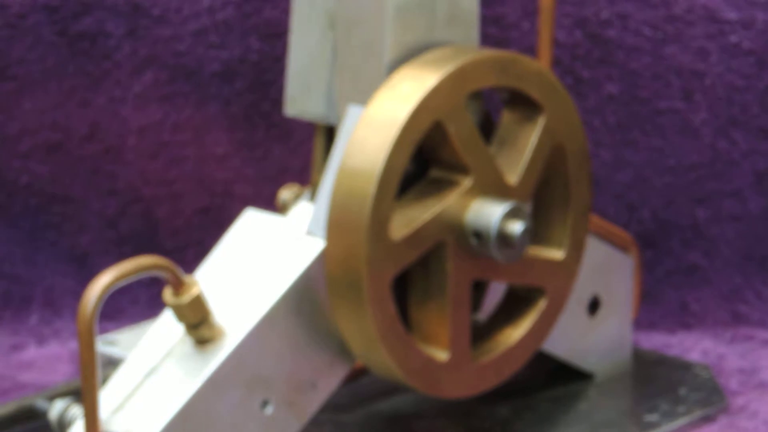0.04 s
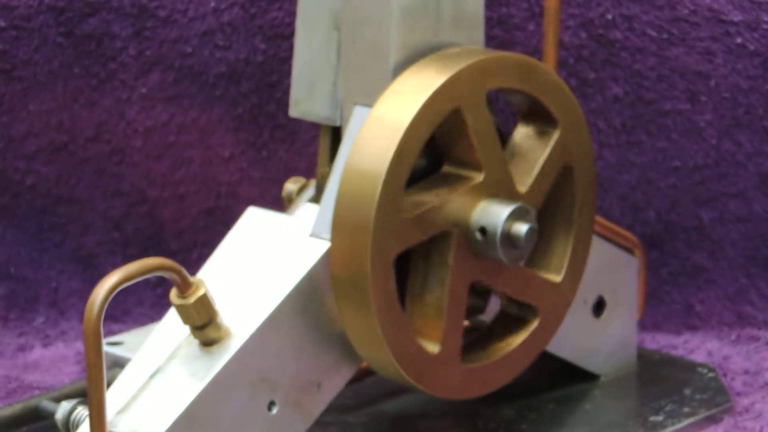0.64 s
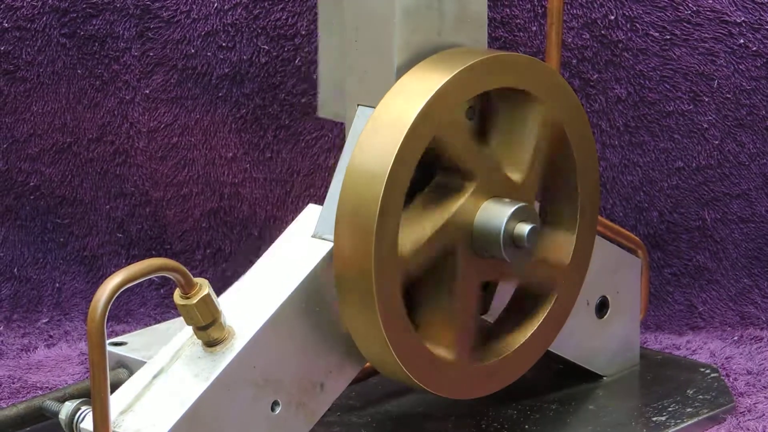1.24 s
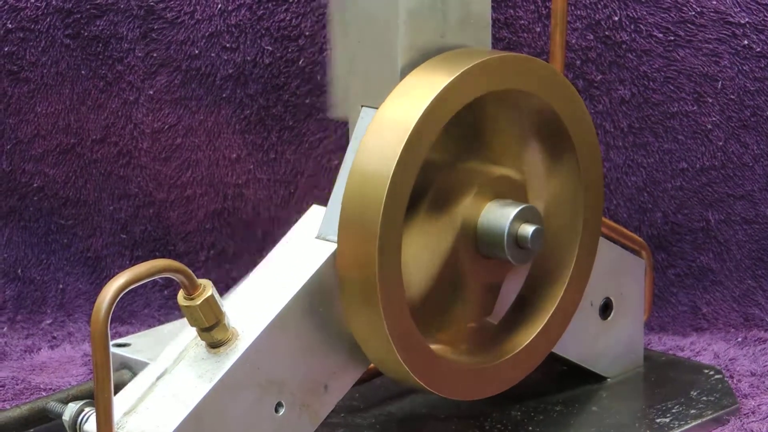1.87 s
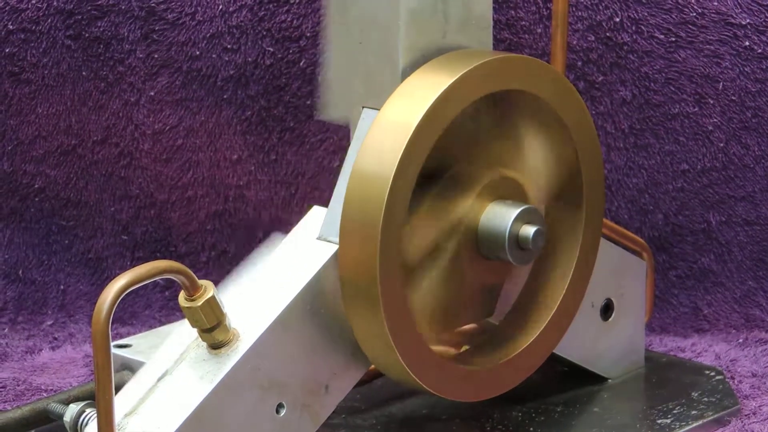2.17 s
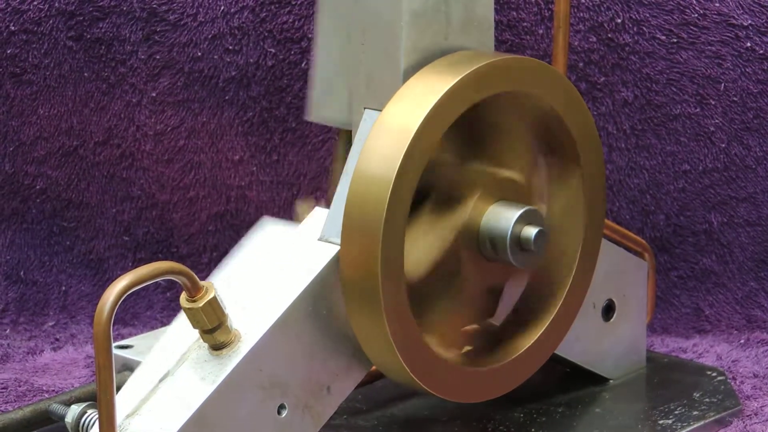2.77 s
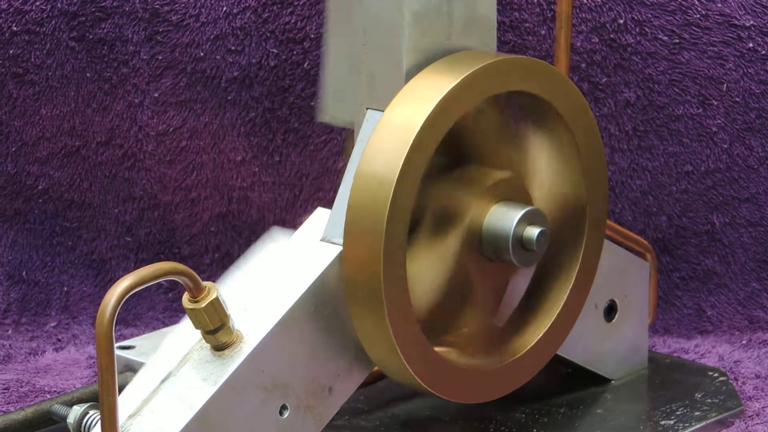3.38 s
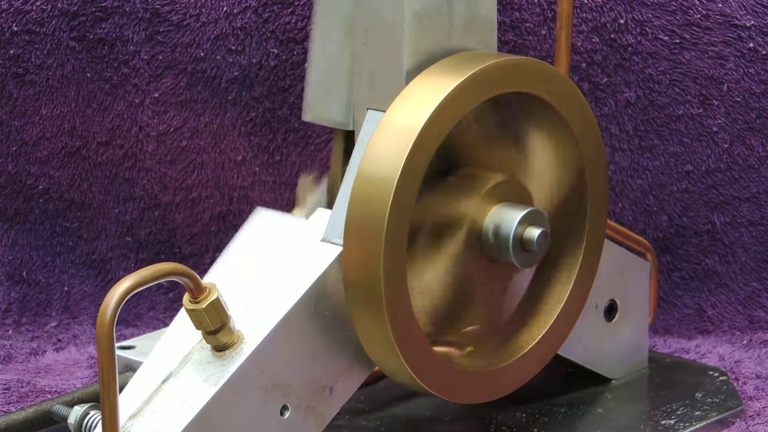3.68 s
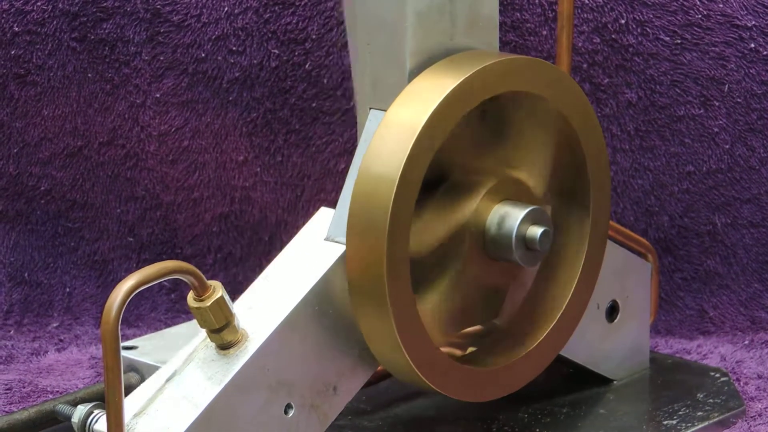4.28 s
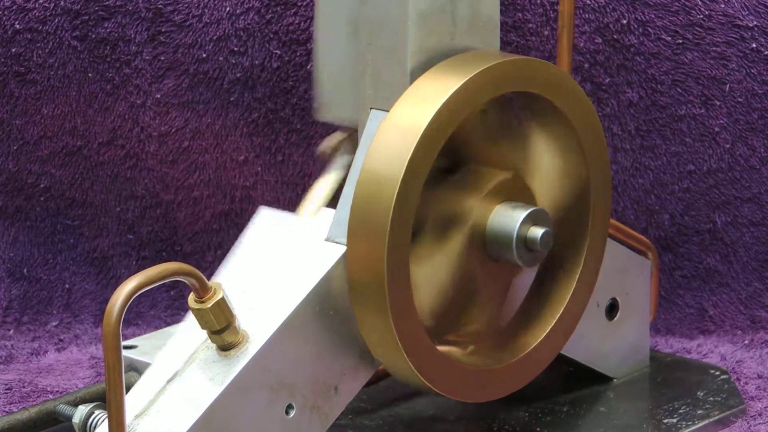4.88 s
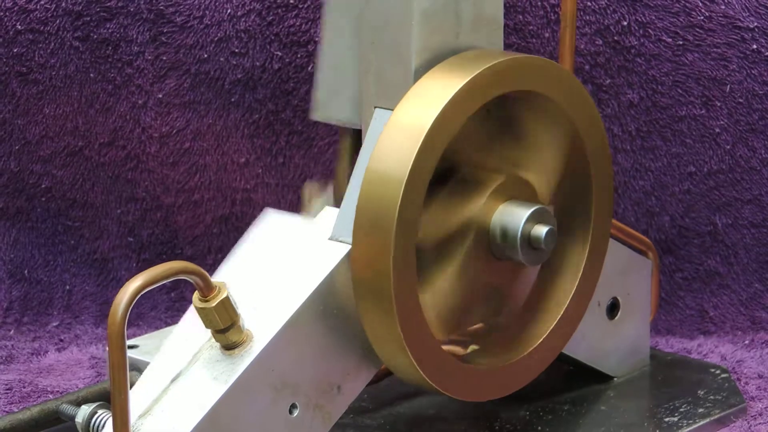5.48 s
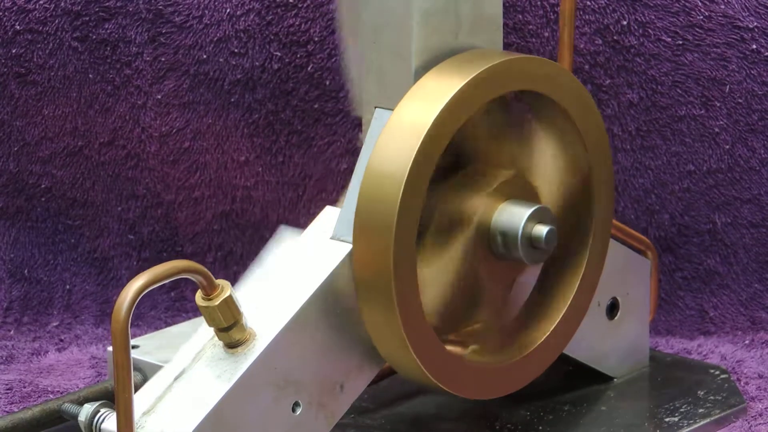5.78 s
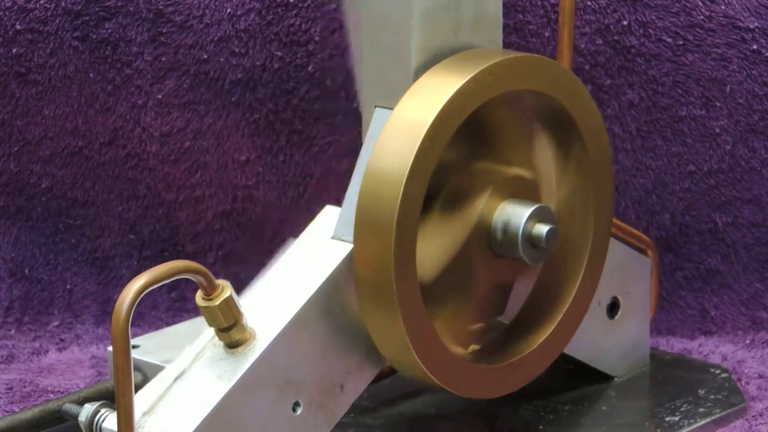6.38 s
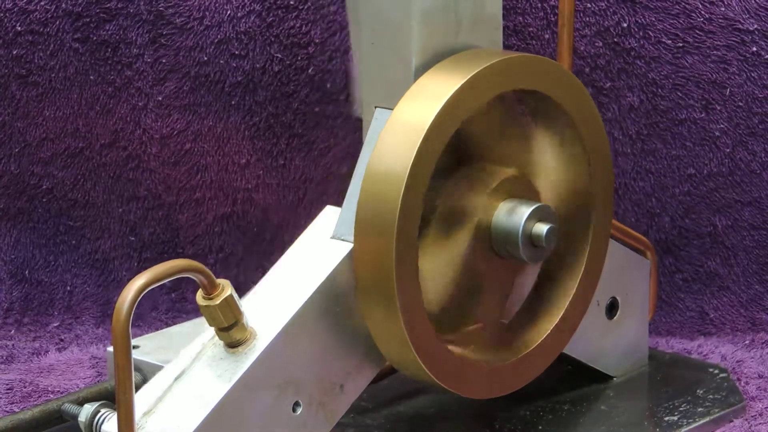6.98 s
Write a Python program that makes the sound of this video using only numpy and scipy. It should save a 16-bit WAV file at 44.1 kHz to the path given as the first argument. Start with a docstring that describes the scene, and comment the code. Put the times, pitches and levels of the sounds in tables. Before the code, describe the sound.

A small model steam engine hisses, squeaks and runs up to a fast, even, spitting exhaust beat, close up indoors.

```python
"""A quiet, furnished room: a small three-cylinder model steam engine on a table, close to a stereo pair.
The shut supply valve weeps, then opens, and steam leaks past the standing pistons. With a few squeaks
the flywheel runs up to about 11 turns a second. The crank angle times the exhaust chuffs, the spits and
thin whistles of the ports, the piston thumps and the bearing knocks. Now and then a water drop bursts."""
import sys
import numpy as np
from scipy import signal
from scipy.fft import rfft, irfft
from scipy.io import wavfile

SR = 44100
rng = np.random.default_rng(int(sys.argv[2]) if len(sys.argv) > 2 else 0)


def file_out(sig):
    """Save sig as 16-bit WAV at sys.argv[1]."""
    # one column per channel
    cols = np.atleast_2d(sig).T
    # limit, then scale
    lim = np.clip(cols, -1, 1)
    pcm = np.round(lim * 32767).astype(np.int16)
    wavfile.write(sys.argv[1], SR, pcm)


N = 318835


def amp(db):
    """Decibels to gain."""
    return 10 ** (np.asarray(db) / 20)


def unit(x):
    """Scales to rms 1."""
    return x / np.sqrt(np.mean(x ** 2) + 1e-20)


def clock():
    """Time of every sample, in seconds."""
    return np.arange(N) / SR


def bell(offset, half_length):
    """A smooth bump: 1 at zero offset, 1/e at half_length to either side."""
    return np.exp(-(offset / half_length) ** 2)


def past(turns, angle):
    """Signed distance of the crank from an angle, in turns."""
    return (turns - angle + .5) % 1 - .5


def spectrum(points):
    """Joins (frequency [Hz], value) points on a log-frequency axis."""
    hz, value = np.transpose(points)
    return np.interp(np.log(np.fft.rfftfreq(N, 1 / SR) + 1), np.log(hz + 1), value)


def wander(rate_hz):
    """Smooth random drift of rms 1, mostly slower than rate_hz."""
    return unit(irfft(rfft(rng.standard_normal(N)) * bell(np.fft.rfftfreq(N, 1 / SR), rate_hz), N))


def resonate(x, hz, width_hz):
    """A steep resonance that follows the curve hz."""
    carrier = np.exp(2j * np.pi * np.cumsum(hz) / SR)
    pole = np.exp(-np.pi * width_hz / SR)
    return (carrier * signal.lfilter([(1 - pole) ** 2], [1, -2 * pole, pole * pole], x / carrier)).real


# how alike left and right are, band by band; the two sides are nearly the same at 2.4-4 kHz: (frequency [Hz],
# coherence [0-1])
STEREO_LIKENESS = [(60, 0.88), (700, 0.62), (1650, 0.85), (2000, 0.56), (2450, 1), (4050, 0.9),
                   (4400, 0.34), (5100, 0.33), (5800, 0.44), (6600, 0.56), (8100, 0.15), (9400, 0.74),
                   (11500, 0.4), (13000, 0.49)]
def hiss(points, resonances=()):
    """Coloured noise with resonances, partly alike on left and right."""
    left, other = rfft(rng.standard_normal((2, N)))
    shared = np.sqrt(np.clip(spectrum(STEREO_LIKENESS), 0, 1))
    pair = np.array([left, shared * left + np.sqrt(1 - shared ** 2) * other])
    f = np.fft.rfftfreq(N, 1 / SR)
    peaks_db = sum(db / (1 + (2 * (f - hz) / width) ** 2) for hz, width, db in resonances)
    return unit(irfft(pair * amp(spectrum(points) + peaks_db), N))


# the quiet room all around the microphones: (frequency [Hz], level [dB])
ROOM_SPECTRUM = [(20, -5.5), (45, -7), (80, -4.5), (160, -12), (300, -13), (850, -15.5), (1500, -22.5),
                 (3000, -27.5), (6800, -27), (8200, -16.5), (9000, -30), (14400, -30)]
def room_tone(rumble_db=-47, hum_hz=113.4, hum_db=-63):
    """A low rumble and a faint, wavering hum."""
    hum = unit(np.sin(2 * np.pi * hum_hz * clock()) * amp(2.1 * wander(6.8)))
    return amp(rumble_db) * hiss(ROOM_SPECTRUM) + amp(hum_db) * hum


def valve(pitch_hz=8420, swing_hz=260, warble_hz=16.9, width_hz=300, level_db=-60):
    """The shut valve weeps with a faint, warbling whistle until it is opened."""
    warble = np.cos(2 * np.pi * warble_hz * clock())
    whistle = unit(resonate(rng.standard_normal(N), pitch_hz + swing_hz * warble, width_hz))
    shut = np.clip((.39 - clock()) / .03, 0, 1)
    return whistle * amp(level_db + 6.2 * warble) * shut


OPEN_S, START_S = 0.33, .7799  # the valve opens; the flywheel starts
# resonances of the steam passages: (frequency [Hz], width [Hz], boost [dB])
PASSAGE_RESONANCES = [(3100, 850, 1.5), (8150, 180, 2), (9880, 200, 4)]
# the open pipe, heard close up: (frequency [Hz], level [dB])
OPEN_PIPE_SPECTRUM = [(700, -23), (1300, -12), (2000, -9), (2600, -3.5), (3300, 1.5), (4000, -4),
                      (5000, -12), (6500, -2), (7300, -4), (8400, -7), (9200, 2), (10000, 3.5),
                      (11200, -14), (14400, -7)]
def open_pipe(swell_s=0.26, level_db=-31):
    """A hollow hiss swells as the valve opens and fades as the wheel begins to turn."""
    age = np.maximum(clock() - OPEN_S, 0) / swell_s
    swell = age * np.exp((1 - age ** 2) / 2)
    return hiss(OPEN_PIPE_SPECTRUM, PASSAGE_RESONANCES) * amp(level_db) * swell


# supply pressure behind the leak, exhaust and port whistles: (time [s], level [dB])
SUPPLY_PRESSURE = [(1.2, -0.4), (3.2, -0.16), (4.4, -.5), (5.4, .1), (6.05, 1.45), (6.75, -0.16),
                   (7.23, -2)]
def supply(fill_s=0.35, steepness=1.3):
    """Strength of the steam: the chest fills once the valve is open, then follows the pressure."""
    filled = 1 - np.exp(-(np.maximum(clock() - OPEN_S, 0) / fill_s) ** steepness)
    return filled * amp(np.interp(clock(), *np.transpose(SUPPLY_PRESSURE)))


# steam slipping past the pistons: (frequency [Hz], level [dB])
LEAK_SPECTRUM = [(300, -29), (900, -15), (1400, -13.5), (2200, -8), (3000, -3.5), (4300, -3.5),
                 (5200, -3.5), (6500, 0.5), (8300, -1), (9500, 2.5), (11300, -4), (12600, 1), (14400, -2.5)]
def leak(turns, level_db=-23.5, flutter_db=0.85, pulse_db=0.5, sing_hz=4800, sing_db=-14):
    """Steam escapes through a gap, a touch louder once per cylinder; it sings for most of each turn."""
    pulses = sum(bell(past(turns, 0.14 + cylinder / 3), 0.025) for cylinder in range(3))
    rush = hiss(LEAK_SPECTRUM, PASSAGE_RESONANCES) * amp(pulse_db * pulses)
    sing_gate = np.exp(-(past(turns, 0.93) / 0.43) ** 4) * np.clip((clock() - START_S) / 0.43, 0, 1)
    sing = unit(resonate(rng.standard_normal((2, N)), sing_hz + 110 * wander(17), width_hz=450))
    sing *= sing_gate * amp(sing_db + 1.9 * wander(28))
    return (rush + sing) * supply() * amp(level_db + flutter_db * wander(120))


RUNNING_SPEED = 11.3016  # turns a second
def crank(rest_turn=-.113, run_up_s=1.4733, steepness=1.4344, surge_s=6.6019, surge_speed=.7049):
    """Crank position in turns: the flywheel runs up, and surges once just after the pressure swells."""
    run_up = 1 - np.exp(-(np.maximum(clock() - START_S, 0) / run_up_s) ** steepness)
    surge = bell(clock() - surge_s, .6548)
    return rest_turn + np.cumsum(RUNNING_SPEED * run_up + surge_speed * surge) / SR


# steady shaking of the table: (multiple of the crank speed, level [dB])
DRONE_HARMONICS = [(3, -66), (6, -59.5), (10, -64), (12, -61), (13, -63), (17, -63), (25, -62), (28, -67),
                   (34, -69), (36, -69), (41, -68)]
def drone(turns, growth=1.1, waver_db=3.0):
    """The spinning crank shakes the table: low tones, in step with the first piston, climb with speed."""
    speed = np.abs(np.gradient(turns))
    phase = 2 * np.pi * (turns - PISTON_THUMPS[0][0])
    tones = sum(amp(db) * np.sqrt(2) * np.sin(round(order) * phase) for order, db in DRONE_HARMONICS)
    return tones * (speed / speed.max()) ** growth * amp(waver_db * wander(9))


# short, fuzzy tones at start-up: (time [s], half length [s], pitch [Hz], width [Hz], level [dB])
STARTING_SQUEAKS = [(1.06, .045, 900, 280, -48), (1.16, .018, 570, 200, -48), (1.02, .06, 5050, 200, -39),
                    (1.11, .03, 4950, 450, -35), (1.1, .03, 13600, 1200, -28), (1.455, .02, 5000, 450, -36),
                    (1.535, .011, 4800, 350, -33), (1.768, .008, 4780, 300, -35)]
def squeaks():
    """Low rubs, brief steam singing and a thin whistle on the first slow strokes."""
    out = np.zeros(N)
    for time, half_length, hz, width, db in STARTING_SQUEAKS:
        tone = unit(resonate(rng.standard_normal(N), np.full(N, hz), width))
        out += tone * amp(db) * bell(clock() - time, half_length)
    return out


# each cylinder's port cracks open: (angle [turns], half length [turns], level [dB])
PORT_SPITS = [(.026, 0.03, 2.5), (.352, 0.023, 0.9), (.68, .026, -.6)]
# a spit at close range: (frequency [Hz], level [dB])
SPIT_SPECTRUM = [(500, -15), (1800, -7.5), (3200, -4.5), (4800, -6), (7400, 0.5), (8400, 3), (9500, 9.5),
                 (10600, 0.5), (11700, -2), (14400, 0.5)]
def spits(turns, level_db=-19, uneven_db=0.3):
    """Steam spits through each port as it cracks open, harder with speed."""
    speed = np.gradient(turns) * SR / RUNNING_SPEED
    gate = sum(amp(db) * bell(past(turns, angle), half_length) for angle, half_length, db in PORT_SPITS)
    return hiss(SPIT_SPECTRUM) * gate * speed * amp(level_db + uneven_db * wander(15))


def puff_flow(turns, opens, length, opening_turns=0.071, closing_turns=0.066, burst_db=5.5):
    """A puff opens with a burst, settles towards a steady push, and closes."""
    since = (turns - opens + opening_turns) % 1 - opening_turns
    opening = np.clip(1 + since / opening_turns, 0, 1)
    closing = np.clip(.5 + (length - since) / closing_turns, 0, 1)
    return opening * closing * amp(burst_db * bell(since, 0.073))


# three puffs of steam a turn, one long, one short, one faint: (start [turns], length [turns], level [dB])
STEAM_PUFFS = [(0.188, 0.479, 0.5), (.58, 0.11, -2.5), (.86, .08, -7.5)]
# the first slow strokes release a full cylinder at once: (time [s], half length [s], boost [dB])
FIRST_BLASTS = [(1.186, 0.013, 4.5), (1.396, 0.035, 1.5), (1.568, 0.0045, 7.5), (1.796, 0.005, 3.5),
                (1.972, 0.014, 2)]
# the exhaust at close range: (frequency [Hz], level [dB])
CHUFF_SPECTRUM = [(400, -31), (1400, -19.5), (2200, -8), (2900, -0.5), (3550, 1), (4500, -3.5), (5300, -4),
                  (6300, 2.5), (8200, 0), (9800, 7), (11000, 2), (12200, 0.5), (14400, 1)]
# resonances of the exhaust pipe: (frequency [Hz], width [Hz], boost [dB])
PIPE_RESONANCES = [(1614, 240, 9.2), (3540, 290, 4.9), (6740, 320, 2.1), (9570, 150, 2.4),
                   (10100, 260, 1.5)]
def exhaust(turns, chuff_db=-23, sputter_db=1.0, uneven_db=1.17):
    """Three puffs and three short spits a turn; wet steam makes them sputter."""
    blast_db = sum(db * bell(clock() - time, half_length) for time, half_length, db in FIRST_BLASTS)
    power = sum((amp(db) * puff_flow(turns, opens, length)) ** 2 for opens, length, db in STEAM_PUFFS)
    chuffs = hiss(CHUFF_SPECTRUM, PIPE_RESONANCES) * np.sqrt(power) * amp(chuff_db + blast_db)
    working = np.clip(turns / .1, 0, 1)  # no exhaust before the first stroke
    steam = (chuffs + spits(turns)) * working * supply()
    return steam * amp(sputter_db * np.tanh(wander(440)) + uneven_db * wander(63))


def blows(turns, angles, levels_db, modes, uneven_db, growth, jitter_s=.00005):
    """One blow a turn at each crank angle, harder with speed, rings a set of modes."""
    speed, hits = np.gradient(turns) * SR, np.zeros(N)
    for angle, db in zip(angles, levels_db):
        at = np.flatnonzero(np.diff(np.floor(turns - angle)) > 0)
        size, late = rng.standard_normal((len(at), 2)).T
        at = np.clip(at + np.round(late * jitter_s * SR).astype(int), 0, N - 1)
        hits[at] += amp(db + uneven_db * size) * np.abs(speed[at] / speed.max()) ** growth
    t = np.arange(SR // 4) / SR
    ring = sum(amp(db - 60 * t / t60) * np.sin(2 * np.pi * hz * t) for hz, db, t60 in modes)
    return signal.oaconvolve(hits, ring)[:N]


# one thump per piston: (angle [turns], level [dB])
PISTON_THUMPS = [(0.032, 1.5), (0.362, 7), (.695, 2.5)]
# the table under the engine: (frequency [Hz], level [dB], t60 [s])
TABLE_MODES = [(70.6, -13.5, 0.17), (135, 3, 0.063), (102, -7, 0.1)]
def pistons(turns, level_db=-47.5):
    """Each piston's stroke thumps the table."""
    angles, levels_db = np.transpose(PISTON_THUMPS)
    return amp(level_db) * blows(turns, angles, levels_db, TABLE_MODES, uneven_db=0.8, growth=1.5)


# play in the bearings: (angle [turns], level into the base [dB], level into the rods [dB])
BEARING_KNOCKS = [(.075, 1.5, -1), (.22, 0, -3.5), (.405, 2.5, -13), (.57, 5, -2.5), (.775, 5, -3)]
# the base plate: (frequency [Hz], level [dB], t60 [s])
BASE_MODES = [(220, -10, 0.043), (306, -4.5, 0.051), (402, 2, 0.033), (450, -4.5, 0.071)]
# the rods: (frequency [Hz], level [dB], t60 [s])
ROD_MODES = [(949, 5, 0.063), (1194, 11, 0.065), (1580, 9.1, 0.032), (2020, 7.4, 0.029)]
def bearings(turns, knock_db=-47.5, tick_db=-51):
    """Loose bearings knock on the base plate and tick in the rods."""
    angles, base_db, rod_db = np.transpose(BEARING_KNOCKS)
    knocks = blows(turns, angles, base_db, BASE_MODES, uneven_db=1.5, growth=3.9)
    ticks = blows(turns, angles, rod_db, ROD_MODES, uneven_db=2.5, growth=0.099, jitter_s=0.000596)
    return amp(knock_db) * knocks + amp(tick_db) * ticks


# ports as narrow slits: (angle [turns], half length [turns], level [dB], pitch [Hz], glide [Hz/turn])
PORT_SLITS = [(.1, 0.031, -2.5, 12950, -8000), (.382, 0.018, -6, 12840, 9008),
              (.722, .055, -4, 13300, 6000)]
def whistles(turns, level_db=-15.5, slow_boost_db=1.5, drift_hz=220, shake_hz=450, tone_share=0.37):
    """Edge tones in a band of hiss glide as each slit opens or closes, louder on slow strokes."""
    gates = np.array([amp(db) * bell(past(turns, angle), half) for angle, half, db, _, _ in PORT_SLITS])
    pitches = np.array([hz + glide * past(turns, angle) for angle, _, _, hz, glide in PORT_SLITS])
    hz = np.average(pitches, axis=0, weights=gates + 1e-9) + drift_hz * wander(40)
    turbulence = rng.standard_normal(N) + 0.42 * rng.standard_normal((2, N))  # mostly alike on both sides
    jet = unit(resonate(turbulence, hz, width_hz=1500))
    tone = unit(np.sin(2 * np.pi * np.cumsum(hz + shake_hz * wander(890)) / SR))
    voice = np.sqrt(tone_share) * tone + np.sqrt(1 - tone_share) * jet
    slowness = 1 - np.gradient(turns) * SR / RUNNING_SPEED
    return voice * gates.sum(0) * supply() * amp(level_db + slow_boost_db * slowness + 0.5 * wander(25))


# drops of condensed water: (time [s], level [dB])
WATER_DROPS = [(1.957, -22), (2.398, -18), (4.69, -20), (5.231, -14), (6.072, -10), (6.186, -17.5)]
def drops(half_length_s=0.0014):
    """Each drop bursts in a port with a single sharp spit."""
    bursts = sum(amp(db) * bell(clock() - time, half_length_s) for time, db in WATER_DROPS)
    return hiss(SPIT_SPECTRUM) * bursts


# hard surfaces near the engine and microphones: (delay [s], level [dB])
NEAR_ECHOES = [(.0013, -44), (.0021, -29.5), (.0029, -30.5), (.0047, -20.5)]
def room(x, t60_s=0.06, wet_db=-19):
    """Adds close reflections and the short, soft tail of a furnished room."""
    t = np.arange(SR // 3) / SR
    tail = rng.standard_normal(len(t)) * amp(-60 * t / t60_s) * (t > .003)
    response = amp(wet_db) * tail / np.linalg.norm(tail)
    for delay, db in NEAR_ECHOES:
        response[round(delay * SR)] += amp(db)
    return x + signal.oaconvolve(x, response[None], axes=1)[:, :N]


def scene():
    """The engine close up, the room tone behind it."""
    turns = crank()
    steam = valve() + open_pipe() + leak(turns) + exhaust(turns) + drops() + whistles(turns)
    engine = steam + squeaks() + pistons(turns) + bearings(turns) + drone(turns)
    return room(engine) + room_tone()


# balance of the microphone pair: (frequency [Hz], left minus right [dB])
MIC_BALANCE = [(30, 1), (150, 3.5), (1200, 2.5), (2400, 0), (3800, 0.5), (4350, 2.5), (5600, -0.5),
               (7400, -0.5), (9400, 3.5), (10300, 2.5), (11700, 1.5), (13300, 0.5)]
# phase between the microphones: (frequency [Hz], left lead [rad])
MIC_PHASE = [(50, 0.47), (250, 0.15), (4100, 0), (4500, 0.3), (4950, -0.92), (5350, -0.36), (6600, -0.63),
             (8500, .3), (10500, -0.28), (12100, -0.52), (13700, -0.28)]
def record(dry, cutoff_hz=14250):
    """The two microphones differ in level and phase; the highest treble is cut off."""
    left_gain = amp(spectrum(MIC_BALANCE) / 2) * np.exp(.5j * spectrum(MIC_PHASE))
    pair = irfft(rfft(dry) * np.array([left_gain, 1 / left_gain]), N)
    lowpass = signal.firwin(1501, cutoff_hz, window=("kaiser", 8), fs=SR)
    return signal.oaconvolve(pair, lowpass[None], "same")


dry = scene()
out = record(dry)
file_out(out)
```